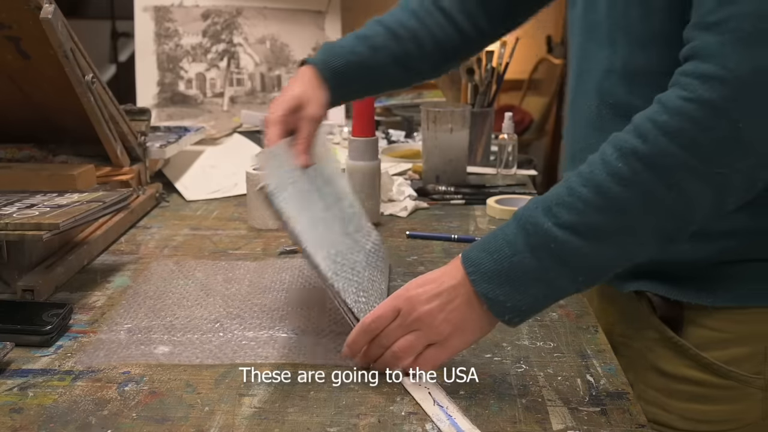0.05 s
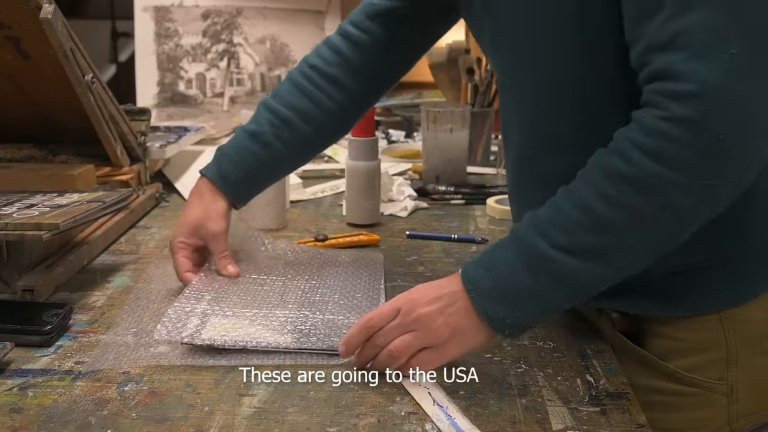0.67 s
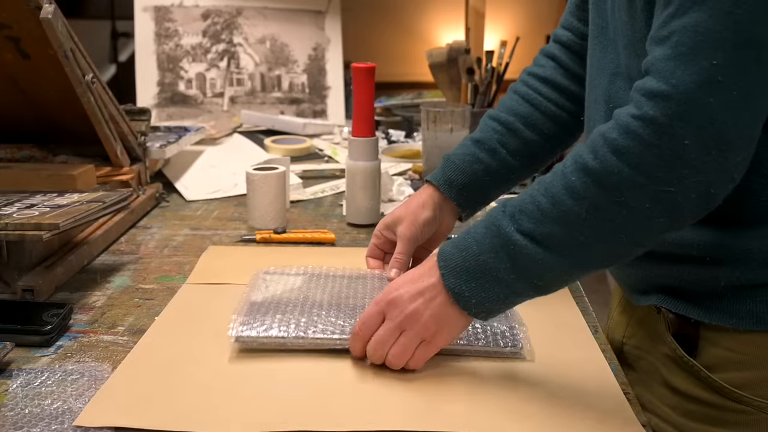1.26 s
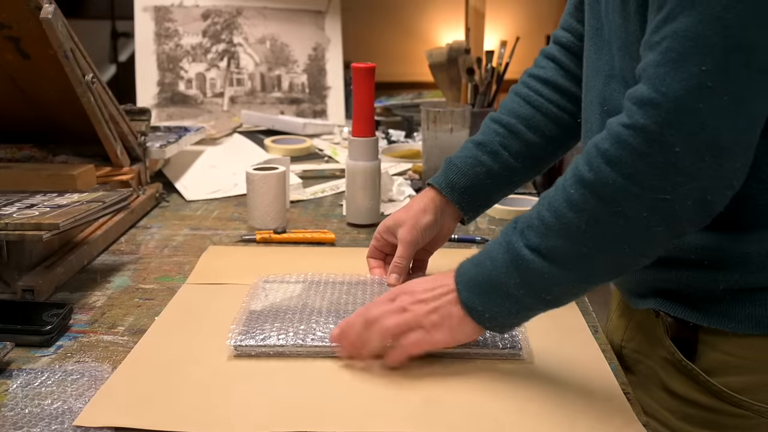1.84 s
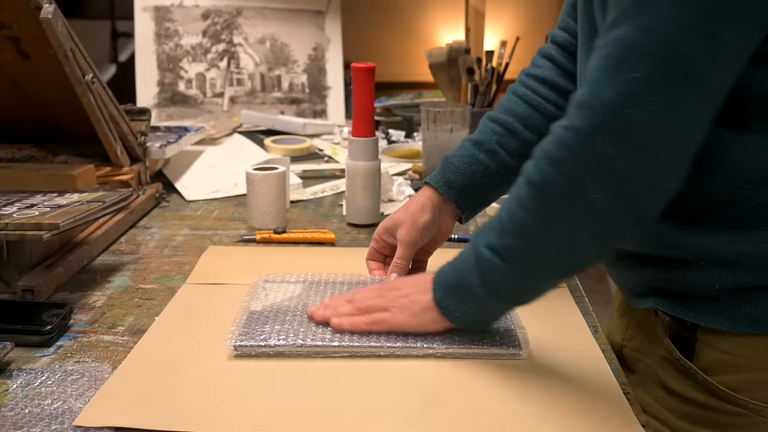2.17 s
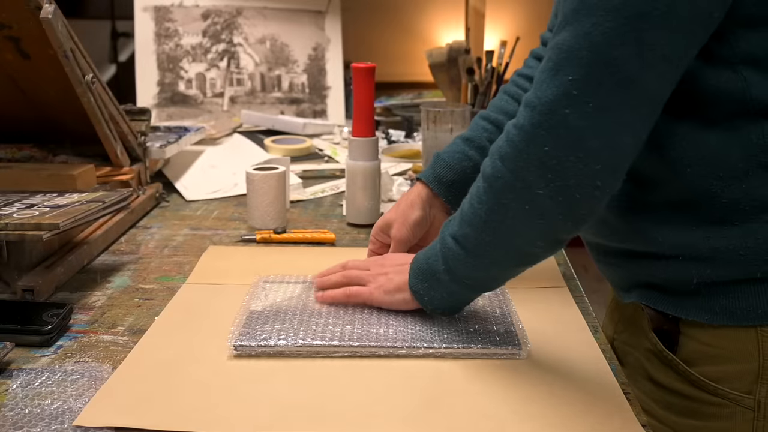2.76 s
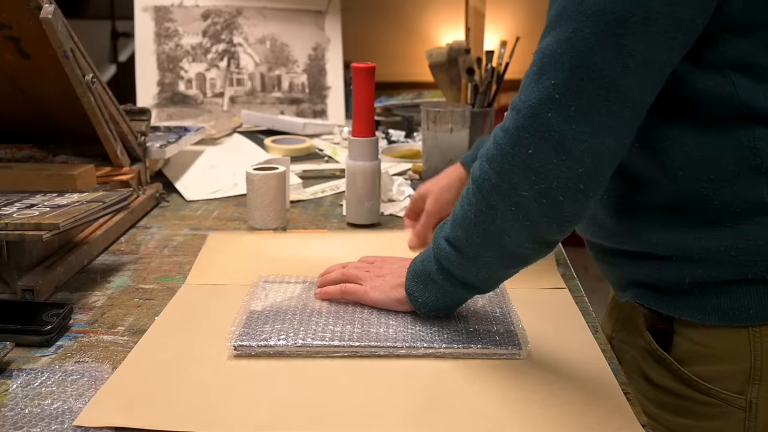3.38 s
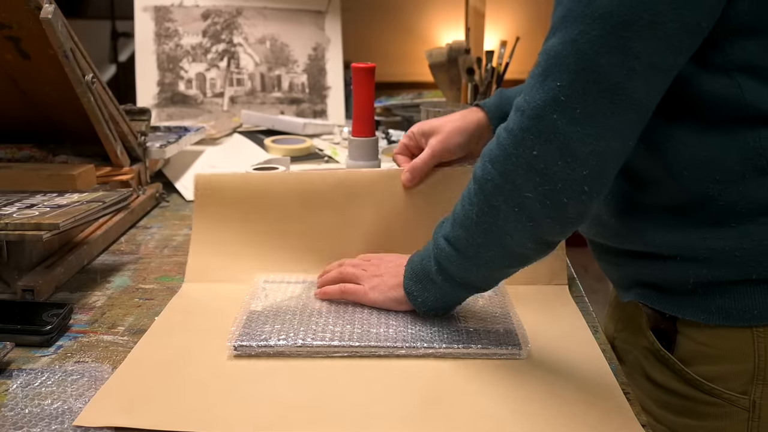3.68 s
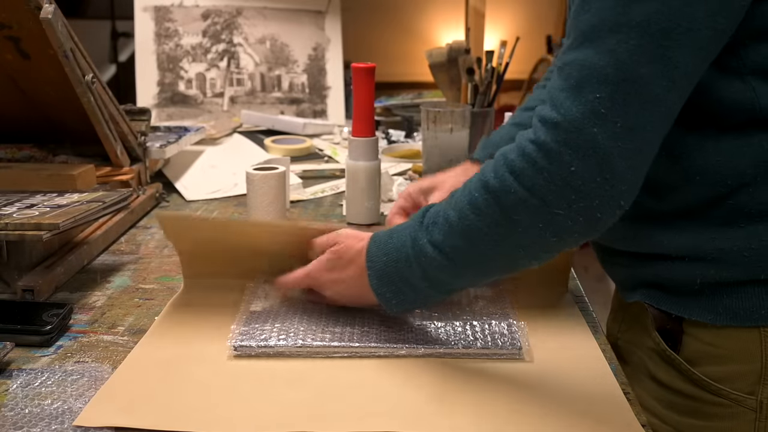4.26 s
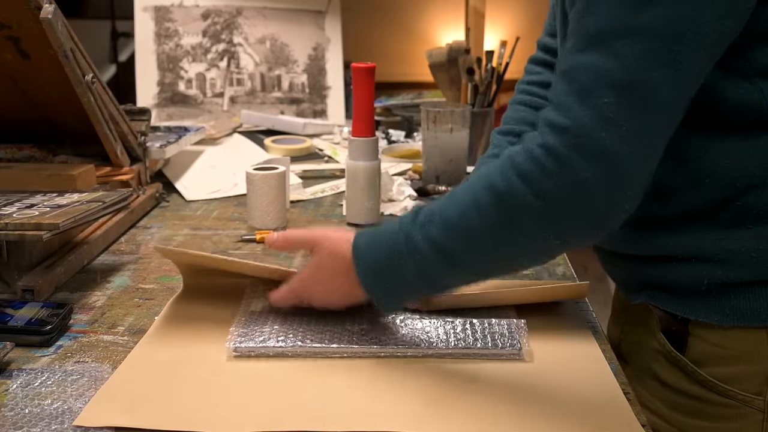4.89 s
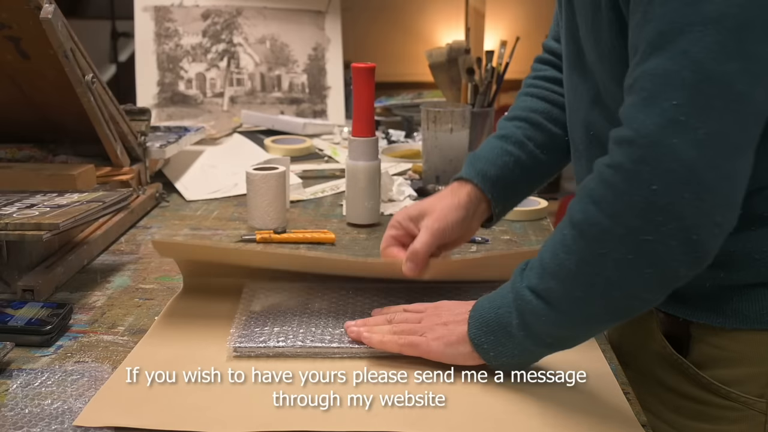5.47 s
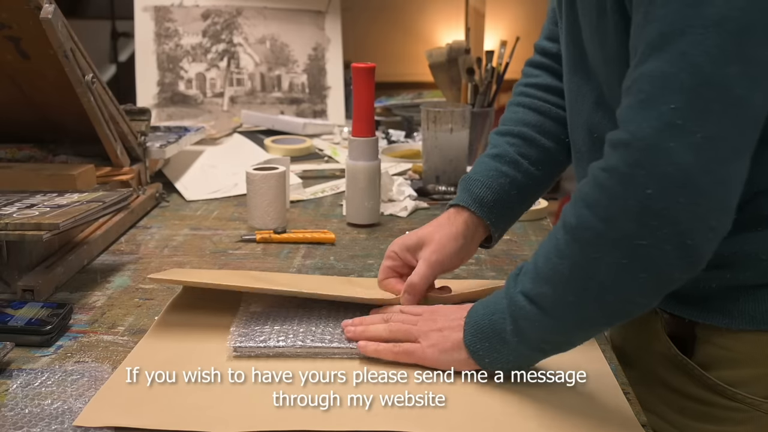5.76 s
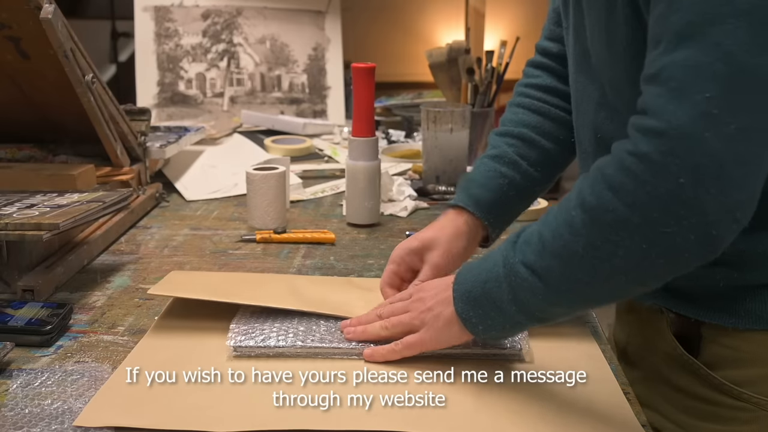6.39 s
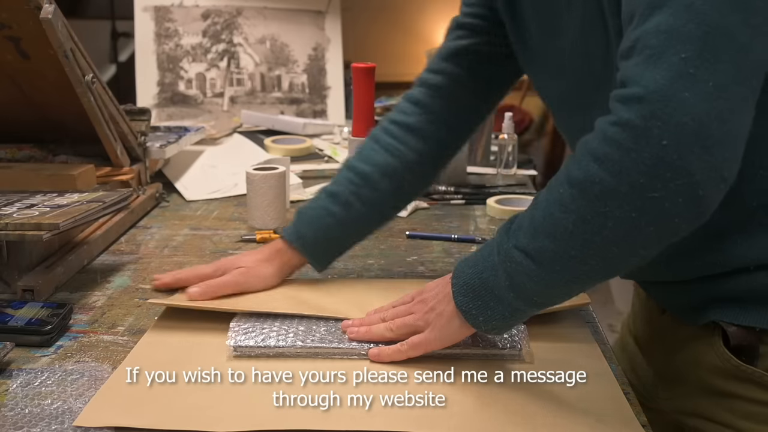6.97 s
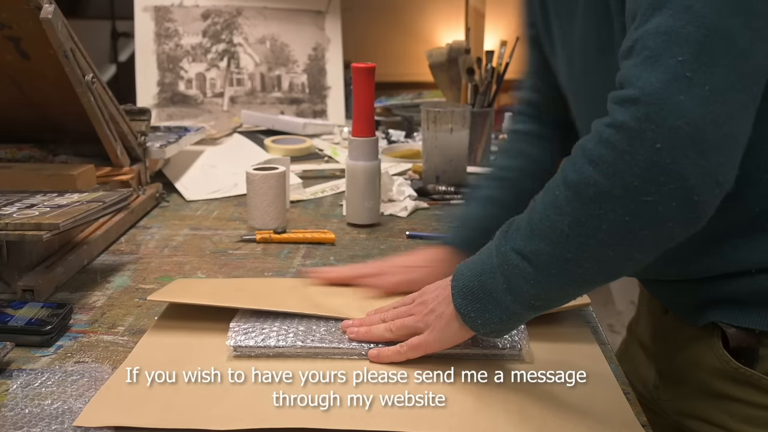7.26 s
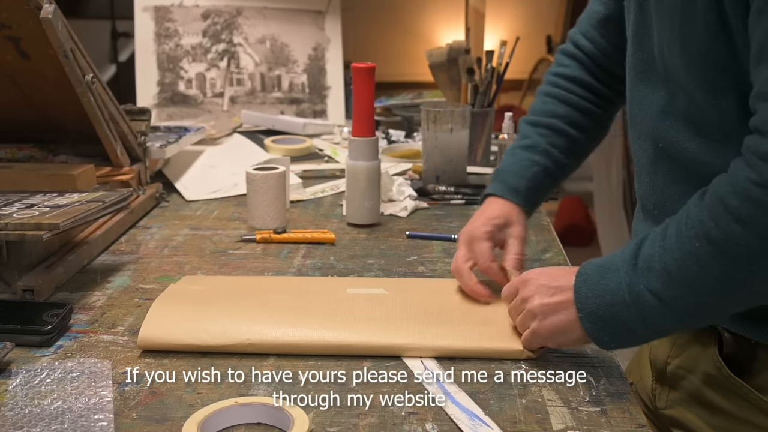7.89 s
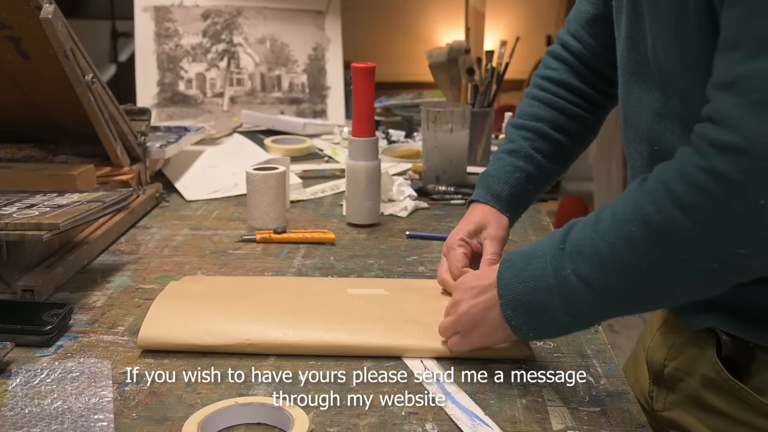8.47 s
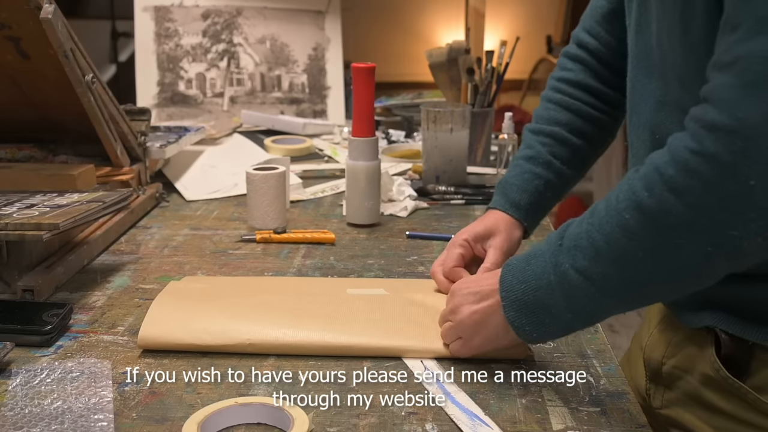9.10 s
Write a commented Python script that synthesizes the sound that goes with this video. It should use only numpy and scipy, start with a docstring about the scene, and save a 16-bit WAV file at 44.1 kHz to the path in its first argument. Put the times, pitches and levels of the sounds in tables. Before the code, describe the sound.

Hands smooth crinkling bubble wrap and fold a stiff paper sheet over it, with hollow pops and a sweeping rub.

```python
"""Packing a wrapped book.

A book in bubble wrap is laid on a work table, smoothed by hand and folded into a stiff paper mailer.
The film rustles and its creases tick; the paper slides, flexes and buckles with hollow snaps; a palm
sweeps out and back over the fold. Two close microphones hear it in a small studio, over a low rumble."""
import sys
import numpy as np
from scipy import signal
from scipy.io import wavfile

SR = 44100
rng = np.random.default_rng(int(sys.argv[2]) if len(sys.argv) > 2 else 0)


def unload_audio(sound):
    """Save the sound as a 16-bit wav file, at the path given as the first command line argument."""
    columns = np.transpose(np.atleast_2d(sound))
    # keep every value between -1 and 1, then stretch to whole-number steps
    steps = np.round(np.clip(columns, -1, 1) * 32767)
    wavfile.write(sys.argv[1], SR, steps.astype(np.int16))


N = 407484
TAKES_SHEET_S = 3.15   # hands go from wrap to paper

# hand strokes on the wrap: peak_s, rise_s, fall_s, swish_db, crinkle_db, rub_db
WRAP_STROKES = [(.1, 0.14, .1, -55, -52, -60), (.33, 0.37, 0.42, -56.5, -56, -66.5),
                (.63, .14, 0.1, -48.5, -49.5, -58.5), (.79, 0.076, 0.13, -54, -55, -61.5),
                (1.05, 0.059, 0.057, -61.5, -55, -68), (1.151, 0.056, 0.043, -66, -54.5, -69),
                (1.31, .1, 0.075, -59, -53, -63), (1.519, 0.047, 0.046, -53.5, -51, -59),
                (1.63, 0.022, .03, -58, -59, -66), (1.81, 0.074, 0.1, -53, -53.5, -64),
                (1.89, 0.036, 0.022, -49.5, -38.5, -53), (2.09, 0.13, 0.085, -47.5, -49, -54.5),
                (2.33, 0.22, 0.13, -49.5, -49, -57), (2.439, 0.011, 0.035, -43.5, -51, -62),
                (2.83, 0.28, 0.17, -51.5, -50.5, -64.5), (3.01, 0.044, 0.054, -52, -51.5, -63),
                (3.109, 0.05, .025, -51.5, -50, -60.5)]
# ticks of film creases and paper edges: start_s, level_db, centre_hz
CREASE_TICKS = [(0.19, -36, 8100), (0.227, -36, 9200), (0.435, -37, 6400), (0.742, -37, 7200),
                (0.877, -39.5, 2960), (0.929, -41, 3500), (0.979, -39.5, 6300), (1.054, -38, 11600),
                (1.139, -38, 8800), (1.234, -37.5, 8500), (1.618, -37.5, 9000), (1.767, -35.5, 3700),
                (1.804, -33, 7800), (1.913, -29, 5150), (2.095, -29, 4870), (2.412, -36, 9000),
                (2.434, -30, 4600), (2.573, -39, 8430), (2.972, -37, 4640), (4.552, -25.5, 4460),
                (5.832, -29.5, 8000), (5.851, -28.5, 5570), (5.862, -34, 8500), (5.882, -22.5, 6600),
                (6.33, -32.5, 10000), (6.466, -34.5, 6000), (8.067, -41, 14000), (9.117, -28.5, 5000)]
# paper buckles and a few soft knocks of the book: start_s, level_db, pitch_hz, crack_relative_db
BUCKLE_SNAPS = [(0.787, -44, 1280, -17), (1.551, -46, 950, -4.5), (1.799, -40.5, 980, -8),
                (3.502, -40.5, 426, -18), (3.512, -31.5, 774, -27), (3.712, -29, 1080, -22),
                (3.725, -26, 1070, -28), (3.758, -36, 450, -30), (3.896, -35, 468, -28),
                (4.006, -35, 1330, -4.5), (4.522, -33, 586, -16), (4.55, -45, 980, -2),
                (4.627, -41, 810, -21), (4.785, -30, 750, -32), (5.053, -38.5, 590, -22),
                (5.392, -35, 760, -14), (5.416, -24.5, 1020, -13.5), (5.422, -25.5, 1050, -28),
                (5.722, -30.5, 1000, -31), (5.759, -33, 656, -19), (6.018, -32.5, 1120, -12),
                (6.156, -24, 840, -13), (6.167, -36, 1490, -9.5), (6.289, -41, 1000, -12),
                (6.382, -28.5, 1100, -25), (6.392, -35, 1500, -10.5), (6.403, -31, 1030, -31),
                (6.464, -36, 1390, -17), (6.599, -21, 1150, -33), (6.633, -25, 800, -25),
                (6.699, -14, 1020, -21.5), (6.724, -19, 990, -23), (6.752, -19.5, 860, -14),
                (6.81, -19, 1100, -21), (6.817, -12.5, 1070, -15.5), (6.96, -23.5, 990, -12),
                (6.977, -21.5, 980, -20), (7.256, -28, 1320, -24), (7.333, -22.5, 1190, -27),
                (7.399, -18.5, 1310, -34), (7.421, -15.5, 1310, -38), (7.473, -18, 1350, -11.5),
                (7.616, -33, 535, -35), (7.651, -34, 687, -35), (7.862, -29.5, 1030, -23),
                (7.96, -29.5, 1400, -20), (7.972, -34, 1440, -8.5), (8.042, -39, 790, -28),
                (8.163, -29.5, 725, -19), (8.4, -29, 1000, -27), (8.41, -12.5, 1350, -16),
                (8.505, -33.5, 1300, -18), (8.576, -34.5, 680, -24), (8.66, -39, 910, -42),
                (8.749, -32.5, 950, -39), (9.055, -38.5, 297, -20), (9.117, -20, 1180, -35)]
# pushes that fold and tuck the sheet, and at 7.71 s a hiss that starts abruptly: peak_s, rise_s, fall_s,
# slide_db, bend_db
FOLD_PUSHES = [(3.28, 0.043, 0.075, -61.5, -54.5), (3.46, 0.092, 0.064, -52.5, -56.5),
               (3.64, 0.11, 0.061, -59, -57.5), (3.74, 0.068, 0.11, -56.5, -52.5),
               (4.01, 0.087, 0.063, -44, -50), (4.2, 0.11, 0.3, -45.5, -58.5),
               (4.42, 0.093, 0.088, -43, -42.5), (4.562, 0.028, 0.022, -41, -55),
               (4.68, 0.27, 0.14, -49.5, -53.5), (4.951, 0.093, 0.091, -42.5, -51.5),
               (5.17, 0.15, 0.075, -55.5, -77), (5.298, 0.056, 0.064, -38.5, -46.5),
               (5.42, 0.072, 0.095, -43, -47), (5.55, 0.059, 0.21, -47.5, -69),
               (5.69, 0.066, 0.1, -42, -43.5), (5.86, 0.061, 0.06, -46, -65),
               (6.019, 0.084, 0.06, -41.5, -49.5), (6.158, 0.049, 0.058, -44.5, -45.5),
               (6.39, 0.072, 0.038, -49, -53), (6.57, 0.14, 0.18, -46, -50.5),
               (7.709, 0.014, 0.056, -50.5, -63), (7.89, 0.017, 0.044, -55, -47),
               (7.97, 0.022, .045, -46.5, -43), (8.24, 0.12, .12, -47.5, -56),
               (8.47, 0.07, 0.14, -52.5, -53), (8.8, 0.05, 0.32, -64.5, -67),
               (8.961, 0.017, 0.048, -55, -69), (9.2, 0.18, .15, -56, -56)]
# soft thuds of the slack sheet: peak_s, level_db
SLACK_FLOPS = [(3.51, -52), (3.79, -44), (3.899, -50.5), (4.08, -55), (5.42, -49), (5.76, -46), (6.03, -54),
               (6.16, -48), (6.97, -48.5), (7.55, -54), (7.97, -52), (9.057, -61)]
# palm sweep, out and back: time_s, level_db
PALM_SWEEP = [(6.64, -61), (6.678, -49.5), (6.698, -46), (6.8, -39), (6.972, -43), (7.046, -47),
              (7.086, -61.5), (7.128, -50), (7.194, -43.5), (7.222, -43), (7.312, -39.5), (7.486, -40.5),
              (7.56, -47.5), (7.614, -57), (7.66, -83)]
# studio echo bands: centre_hz, t60_s, level_db
ECHO_BANDS = [(151, .4, -4), (416, 0.17, -4), (960, 0.096, -3.5), (2480, 0.28, -6.5), (6600, 0.14, -7),
              (13900, 0.08, -10)]
# source spectra: frequency_hz, density_db
RUMBLE_SPECTRUM = [(20, -4.5), (35, -7), (60, -0.5), (85, -5.5), (110, 1), (140, -6), (175, -0.5),
                   (230, -8), (320, -11.5), (500, -18), (1000, -20.5), (3000, -38.5), (8000, -59),
                   (16000, -45)]
FILM_SPECTRUM = [(700, -21.5), (2000, -2.5), (3000, -1.5), (4200, 1.5), (5600, -1.5), (8000, -13.5),
                 (15000, -17.5)]
CREASE_SPECTRUM = [(2500, -13), (6000, 3.5), (8000, 6), (11000, 1), (16000, -2.5)]
BOOK_SPECTRUM = [(120, -2), (300, 1), (550, 4), (780, 5), (1050, 5), (1500, 7.5), (1900, -4.5), (3500, -8),
                 (9000, -20)]
CRUMPLE_SPECTRUM = [(200, -20.5), (400, 7), (600, 4.5), (900, 7), (1250, 6), (1550, 5.5), (2000, -2.5),
                    (2800, -3), (3600, -16.5), (6000, -21), (14000, -28)]
FLAP_SPECTRUM = [(50, -12.5), (110, -2), (200, 3.5), (380, -1), (600, -2), (1200, -15.5), (4000, -34)]
SLIDE_SPECTRUM = [(300, -8.5), (900, -3.5), (2000, -2), (3400, -2.5), (5500, -3.5), (8000, -7), (11000, -9),
                  (16000, -12.5)]
PALM_SPECTRUM = [(200, -18), (400, 3.5), (620, -13), (930, 6.5), (1300, -6), (2000, 3), (3500, 1),
                 (5200, 0), (7500, 0.5), (11000, -1.5), (16000, -4.5)]

TIME_S = np.arange(N) / SR


def from_db(db):
    """Decibels to gain."""
    return 10 ** (np.asarray(db) / 20)


def unit_rms(x):
    """Scale to rms 1."""
    return x / np.sqrt(np.mean(x ** 2) + 1e-20)


def butter(x, hz, kind, order=2):
    """Causal Butterworth filter."""
    sos = signal.butter(order, np.clip(hz, 10, .45 * SR), kind, fs=SR, output="sos")
    return signal.sosfilt(sos, x)


def colour(x, spectrum, size=4096):
    """Minimum-phase filter with the given spectrum; output rms 1."""
    hz, db = np.transpose(spectrum)
    grid_hz = np.abs(np.fft.fftfreq(size, 1 / SR)) + 1
    log_gain = np.log(from_db(np.interp(np.log(grid_hz), np.log(hz), db)))
    response = np.fft.ifft(np.exp(np.conj(signal.hilbert(log_gain)))).real
    return unit_rms(signal.oaconvolve(x, response[None], axes=1)[:, :N])


def two_mics(pair, bass_side=0.13, apart_hz=1880):
    """Two independent signals to left and right: alike in the bass, unrelated in the treble."""
    side = (1 - bass_side) * butter(pair[1], apart_hz, "high", order=1) + bass_side * pair[1]
    return np.array([pair[0] + side, pair[0] - side])


def add(track, start_s, sound):
    """Mix in a stereo sound."""
    start = max(0, int(start_s * SR))
    track[:, start:start + sound.shape[1]] += sound[:, :max(0, N - start)]


def movements(rows, edge_db=10, flank_power=1.72):
    """Gain of swells, each edge_db down at rise_s before and fall_s after its peak; powers add."""
    t, power = TIME_S[::40], 0
    for peak_s, rise_s, fall_s, level_db in rows:
        away = np.maximum((peak_s - t) / rise_s, (t - peak_s) / fall_s)
        power = power + from_db(level_db - edge_db * away ** flank_power) ** 2
    return np.interp(TIME_S, t, np.sqrt(power))


def friction(spectrum, slips_per_s, size_db, grain_share, flutter_db, grip_hz=60):
    """Tiny uneven slips clump as the grip drifts, over a smooth hiss, in the material's colour."""
    knots = rng.standard_normal(4096)
    grip = unit_rms(np.interp(TIME_S * grip_hz, np.arange(len(knots)), knots))
    slipping = rng.random(N) < slips_per_s * from_db(3 * grip) / SR
    sizes = from_db(size_db * np.minimum(rng.exponential(1, N), 3.5))
    bearing = rng.uniform(0, 2 * np.pi, N)   # each slip radiates its own way
    grains = unit_rms(slipping * sizes * np.array([np.cos(bearing), np.sin(bearing)]))
    hiss = rng.standard_normal((2, N))
    texture = np.sqrt(grain_share) * grains + np.sqrt(1 - grain_share) * hiss
    return colour(two_mics(texture * from_db(flutter_db * grip)), spectrum)


def room_rumble(level_db=-59.5):
    """Steady low noise of the room."""
    return from_db(level_db) * colour(two_mics(rng.standard_normal((2, N))), RUMBLE_SPECTRUM)


def bubble_wrap(hold_db=-67.5):
    """Dragging bubbles swish, film creases crackle; the book beneath adds a dull rub."""
    strokes = np.array(WRAP_STROKES)
    swish, crinkle, rub = [movements(np.column_stack([strokes[:, :3], db])) for db in strokes[:, 3:].T]
    holding = from_db(hold_db) * (TIME_S <= TAKES_SHEET_S)
    film = friction(FILM_SPECTRUM, slips_per_s=2400, size_db=4.5, grain_share=.5, flutter_db=.5)
    creases = friction(CREASE_SPECTRUM, slips_per_s=1500, size_db=4.5, grain_share=.6, flutter_db=.6)
    book = friction(BOOK_SPECTRUM, slips_per_s=700, size_db=2, grain_share=.35, flutter_db=.8)
    return np.hypot(swish, holding) * film + crinkle * creases + rub * book


def crease_ticks(decay_s=0.00083, boost_db=4.5):
    """A crease flicks over: a broad click of about a millisecond."""
    out, t = np.zeros((2, N)), np.arange(SR // 100) / SR
    for start_s, level_db, centre_hz in CREASE_TICKS:
        flick = rng.standard_normal((2, len(t))) * np.exp(-t / decay_s)
        click = butter(flick, [centre_hz / 2, centre_hz * 2], "band")
        click /= np.abs(click).max(axis=1, keepdims=True)
        add(out, start_s, from_db(level_db + boost_db) * click)
    return out


def paper_snaps(rise_cycles=.5, crack_s=.0021, crack_boost_db=2.5, shiver_s=.018, shiver_db=-21):
    """A patch flips and swings about two cycles; its crease cracks; bending waves shiver on."""
    out, t = np.zeros((2, N)), np.arange(SR // 12) / SR
    mic_t = np.maximum(t - np.array([[0], [.00007]]), 0)   # right microphone slightly farther
    for start_s, level_db, pitch_hz, crack_db in BUCKLE_SNAPS:
        age = mic_t * pitch_hz / rise_cycles
        swing = age * np.exp(1 - age) * -np.sin(2 * np.pi * pitch_hz * mic_t)
        swing = butter(swing, 0.12 * pitch_hz, "high", order=1)   # a small patch radiates little bass
        fibres = two_mics(rng.standard_normal((2, len(t))))
        body = unit_rms(butter(fibres, [1950, 3900], "band", order=4))
        edge = unit_rms(butter(fibres[:, ::-1], [4000, 8000], "band", order=1))
        burst = np.sqrt(t / crack_s) * np.exp(1 - t / crack_s)
        crack = from_db(crack_db + crack_boost_db) * burst * (body + from_db(-10) * edge)
        waves = two_mics(rng.standard_normal((2, len(t))))
        waves = unit_rms(butter(waves, [pitch_hz * 0.65, pitch_hz * 3.4], "band"))
        shiver = from_db(shiver_db) * waves * np.exp(-t / shiver_s)
        add(out, start_s, from_db(level_db) * (swing + crack + shiver))
    return out


def palm_pressure():
    """Gain of the palm's sweep; zero outside it."""
    time_s, level_db = np.transpose(PALM_SWEEP)
    touching = (TIME_S >= time_s[0]) & (TIME_S <= time_s[-1])
    return touching * from_db(np.interp(TIME_S, time_s, level_db))


def bending(settle_rise_s=.0027, settle_fall_s=.045, settle_db=-34, db_per_snap_db=.56, palm_db=-5.5):
    """Gain of the sheet's bending: it yields to pushes and the palm, and settles after each snap."""
    pushes = [(s, rise_s, fall_s, bend_db) for s, rise_s, fall_s, _, bend_db in FOLD_PUSHES]
    settling = [(s + settle_rise_s, settle_rise_s, settle_fall_s, settle_db + db_per_snap_db * snap_db)
                for s, snap_db, _, _ in BUCKLE_SNAPS]
    return np.hypot(movements(pushes + settling), from_db(palm_db) * palm_pressure())


def paper_flexing(flap_db=-18, flap_power=0.8, flop_rise_s=0.022, flop_fall_s=0.043):
    """Many small buckles make a hollow crumple; the slack flaps and flops below it."""
    bend = bending()
    flaps = from_db(flap_db) * bend ** flap_power
    flops = movements([(s, flop_rise_s, flop_fall_s, db) for s, db in SLACK_FLOPS])
    buckles = friction(CRUMPLE_SPECTRUM, slips_per_s=600, size_db=4, grain_share=.67, flutter_db=2)
    slack = friction(FLAP_SPECTRUM, slips_per_s=200, size_db=4, grain_share=.66, flutter_db=2.75)
    return bend * buckles + np.hypot(flaps, flops) * slack


def paper_sliding(hold_db=-66.5, cup_start_s=7.3, cup_cutoff_hz=12400):
    """Fibres catch as the sheet slides; hands cupping the corner shade the treble."""
    pushes = movements([push[:4] for push in FOLD_PUSHES])
    holding = from_db(hold_db) * (TIME_S > TAKES_SHEET_S)
    fibres = friction(SLIDE_SPECTRUM, slips_per_s=3000, size_db=4.5, grain_share=.61, flutter_db=.53)
    slide = np.hypot(pushes, holding) * fibres
    shaded = butter(slide, cup_cutoff_hz, "low", order=1)
    cupped = np.clip(TIME_S - cup_start_s, 0, 1)
    return slide + cupped * (shaded - slide)


def palm_sweep(boost_db=5):
    """A palm rubs over the fold: a finer, brighter hiss."""
    hiss = friction(PALM_SPECTRUM, slips_per_s=5400, size_db=-2.5, grain_share=.4, flutter_db=-.75)
    return from_db(boost_db) * palm_pressure() * hiss


def echo_response(first_s=0.0011, table_db=-7, table_s=0.0025):
    """Close echoes off the cluttered table, then a short diffuse tail dying band by band."""
    t = np.arange(SR // 3) / SR
    centre_hz, t60_s, level_db = np.transpose(ECHO_BANDS)
    edges_hz = np.concatenate([[40], np.sqrt(centre_hz[1:] * centre_hz[:-1]), [19000]])
    onset = np.clip(t / first_s - 1, 0, 1)
    response = 0
    for k in range(len(centre_hz)):
        decay = onset * (from_db(-60 * t / t60_s[k]) + from_db(table_db) * np.exp(-t / table_s))
        band = butter(two_mics(rng.standard_normal((2, len(t)))), edges_hz[k:k + 2], "band")
        response = response + from_db(level_db[k]) * band * decay / np.sqrt(np.sum(decay ** 2))
    return response


def studio_echo(x, wet_db=-2):
    """Hands and sheet keep moving, so the echo pattern changes twice a second."""
    out, step = np.zeros((2, N)), SR // 2
    for start in range(0, N, step):
        add(out, start / SR, signal.fftconvolve(x[:, start:start + step], echo_response(), axes=1))
    return from_db(wet_db) * out


def scene():
    """Handling slightly to the left, its echo, and the room's rumble."""
    paper = paper_flexing() + from_db(0.5) * paper_snaps()
    rustle = bubble_wrap() + paper_sliding() + palm_sweep() + crease_ticks()
    handling = paper * from_db([[.9], [-.9]]) + rustle * from_db([[.25], [-.25]])
    rumble = room_rumble() * from_db([[.7], [-.7]])
    return handling + studio_echo(handling) + rumble


def record(dry, cutoff_hz=16000):
    """Steep low-pass."""
    return signal.sosfilt(signal.ellip(12, .1, 80, cutoff_hz, fs=SR, output="sos"), dry)


dry = scene()
out = record(dry)
unload_audio(out)
```